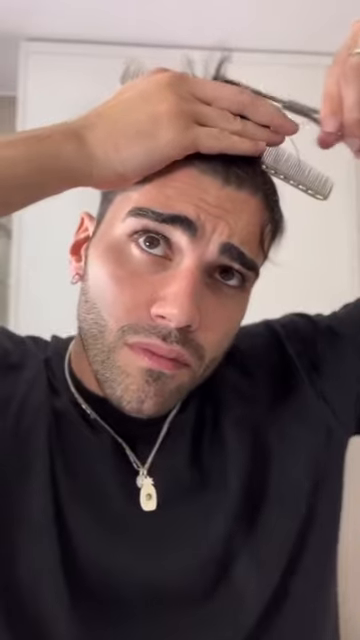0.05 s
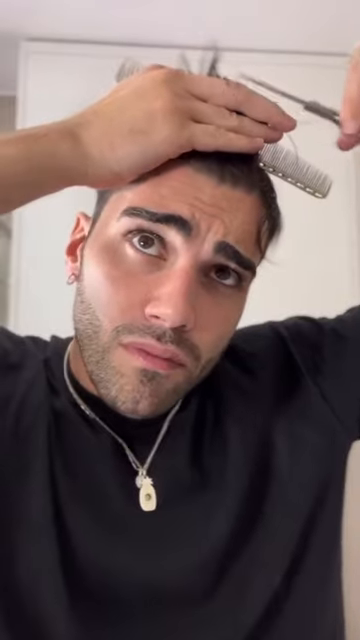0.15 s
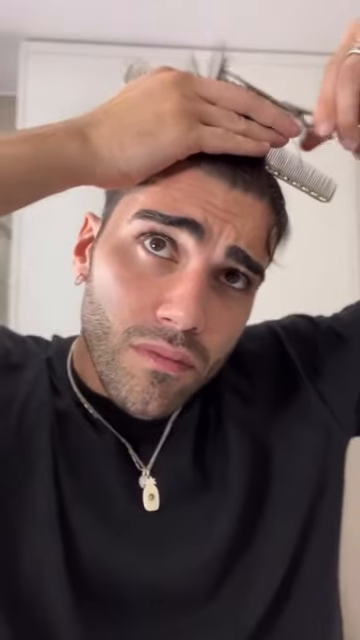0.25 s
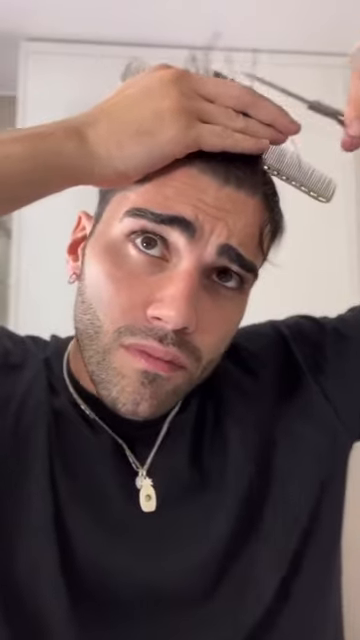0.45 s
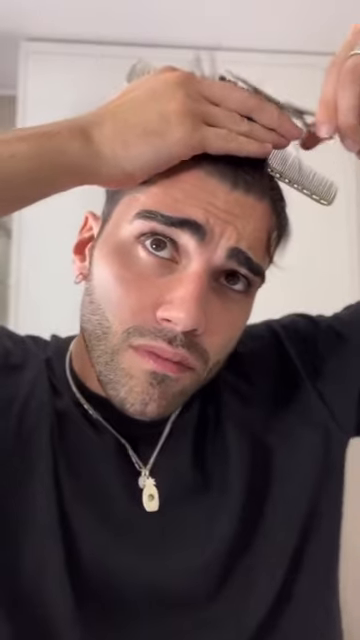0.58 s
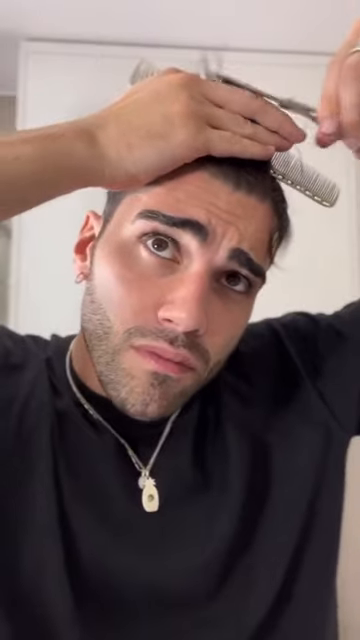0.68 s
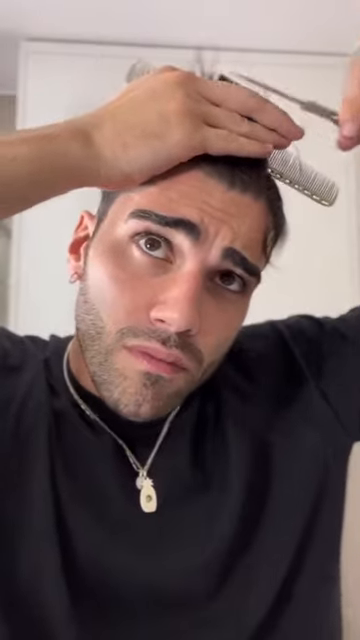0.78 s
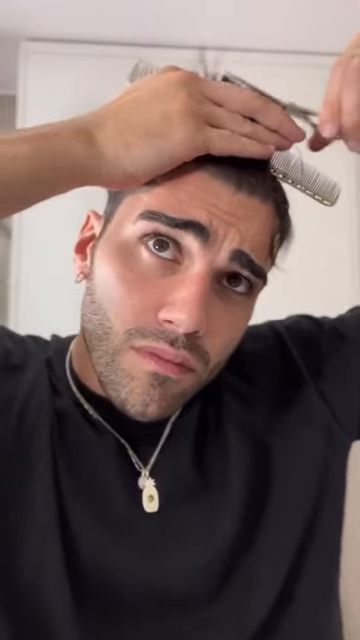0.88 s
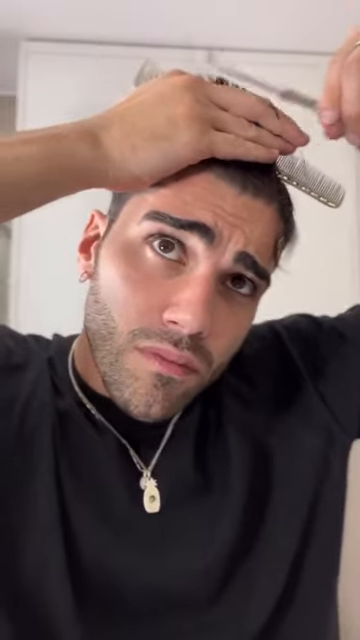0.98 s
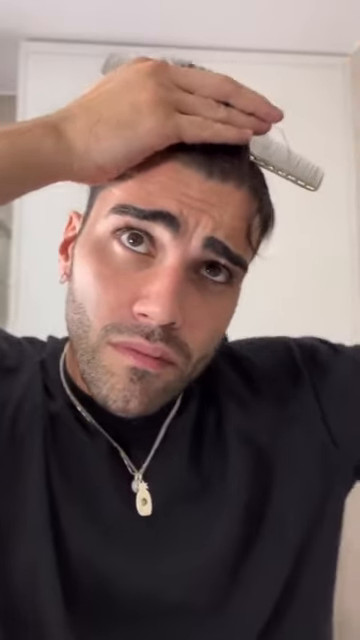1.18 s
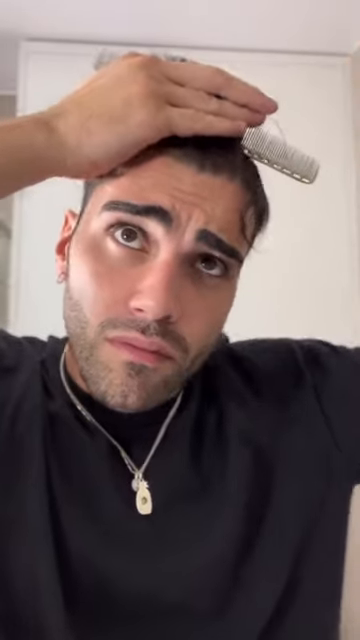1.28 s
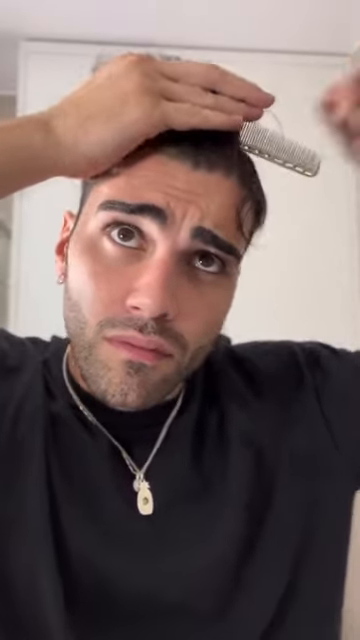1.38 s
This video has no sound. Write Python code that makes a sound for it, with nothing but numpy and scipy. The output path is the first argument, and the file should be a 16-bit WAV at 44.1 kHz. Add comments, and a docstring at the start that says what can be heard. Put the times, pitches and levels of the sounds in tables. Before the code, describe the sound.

Scissors snip through hair three times, close by in a small, bare room.

```python
"""Steel scissors cut hair close to a phone in a small, bare room.
First comes the fading echo of a cut made just before the start. Three cuts follow: each is a swelling
crunch of snapping hairs that ends in the clack of the handles, and then the blades rasp open.
Meanwhile a slow arm movement rustles a sleeve and stirs the room's low boom. Last, a light metal
clink leaves the blades ringing, and the boom sinks over a quiet background of air."""
import sys
import numpy as np
from scipy import signal
from scipy.fft import rfft, irfft
from scipy.io import wavfile

SR = 44100
rng = np.random.default_rng(int(sys.argv[2]) if len(sys.argv) > 2 else 0)


def inscribe(sig):
    """Save sig as 16-bit PCM at rate SR to the path in sys.argv[1].

    A 1-D sig is mono; a 2-D sig holds one channel per row.
    Samples are clipped to [-1, 1] before scaling.
    """
    pcm = np.round(np.clip(np.atleast_2d(sig).T, -1, 1) * 32767)
    wavfile.write(sys.argv[1], SR, pcm.astype(np.int16))


N = 63945
LEAD_S = .2  # the sound begins this long before time 0

# The tones (modes) at which the scissors ring. Each row: pitch in Hz, seconds to fade by 60 dB (t60),
# then relative level in dB when struck, when closing and when sliding open.
SCISSOR_MODES = [(610, 0.0066, -12, -9, -26), (935, 0.007, -7.5, -3, 6), (1158, 0.0092, -11.5, -7.5, -41),
                 (1764, 0.0097, -6.5, -11.5, -20), (2190, .012, -3, -9.5, -25), (2428, 0.011, -13, 3, 8),
                 (3264, 0.0092, -14, -11, -33), (3935, 0.008, -48, -1.5, -22.5),
                 (4230, 0.018, -14.5, -2, -28), (5206, 0.016, -19.5, -8.5, -9), (6110, 0.022, -29, -23, 1),
                 (8000, 0.063, -32, -19, 0.5)]


def cuts(t):
    """The edges slide, bite and crunch ever louder through the hair; the handles hit and bounce once."""
    # Each row: time the blades shut and crunch length in seconds, crunch level in dB, rasp pitch in Hz,
    # levels of hiss, clack and crack in dB, brightness of the clack in dB per octave.
    strokes = [(-.085, 0.023, -27.5, 2540, -33.5, -14.5, -22, -4),
               (0.2429, 0.035, -29.5, 2800, -39, -12, -27.5, -1.5),
               (.5722, 0.038, -32.5, 2460, -38.5, -14, -30.5, -1.5),
               (0.8264, 0.036, -31, 3850, -41.5, -10.5, -21, 1.5)]
    # The crack of steel on steel. Each row: frequency in Hz, relative level in dB.
    crack_colour = [(150, -14.5), (600, -1), (1500, -16.5), (3000, 5.5), (6000, -2.5), (9300, -10.5),
                    (11500, -2), (14500, -1.5), (16000, -11)]
    # The faint sizzle as the edges begin to slide. Each row: frequency in Hz, relative level in dB.
    sizzle_colour = [(3000, -17), (9500, -21), (11500, -8), (14000, -1), (16000, -1.5)]
    slide_db, slide_s, bite_db, bite_s = -51.5, 0.077, -16.5, 0.018
    rise_db, release_s = 29, 0.002
    bounce_db, bounce_s, crack_s = -13.5, 0.0042, 0.0039
    crack, sizzle, out = colour(noise(), crack_colour), colour(noise(), sizzle_colour), 0
    for at, length, crunch_db, rasp_hz, hiss_db, clack_db, crack_db, tilt_db in strokes:
        age = t - at  # negative until the blades shut
        ring, hiss = friction([db + favour(hz, rasp_hz) for hz, _, _, db, _ in SCISSOR_MODES])
        slide = undb(slide_db) * bump(age + slide_s, 2 * slide_s) ** 2 * (age < 0) * sizzle
        bite = undb(bite_db) * bump(age + length, bite_s)  # the edges first catch the hair
        grip = np.clip((age + length) / bite_s, 0, 1)
        release = np.exp(-np.maximum(age, 0) / release_s)
        swell = grip * undb(rise_db * np.minimum(age, 0) / length) * release
        crunch = (swell + bite) * undb(crunch_db) * ring + swell * undb(hiss_db) * hiss
        hit = undb(clack_db) * (clack(age, tilt_db) + undb(bounce_db) * clack(age - bounce_s, tilt_db))
        out = out + slide + crunch + hit + undb(crack_db) * fade(age, crack_s) * crack
    return out


def clack(age, tilt_db):
    """The handles meet and ring the hand-damped scissors; neighbouring tones swing opposite ways."""
    pivot_hz = 2150  # brightness tilts around this pitch
    return radiate(sum((-1) ** k * undb(db + tilt_db * np.log2(hz / pivot_hz)) * mode(age, hz, t60)
                       for k, (hz, t60, db, _, _) in enumerate(SCISSOR_MODES)))


def friction(levels_db):
    """Many tiny snaps along the edges: returns the ring they raise in the blades, and their own hiss."""
    # The hiss of the edges. Each row: frequency in Hz, relative level in dB.
    edge_colour = [(200, -34.5), (1200, -21), (3000, 7), (5500, 8), (7500, 14), (9300, -13), (11500, 8),
                   (14500, 3.5), (16000, 6.5)]
    snaps_per_s, spread_db = 4000, 3
    n = len(clock())
    snaps = (rng.random(n) < snaps_per_s / SR) * rng.choice([-1, 1], n)
    snaps = snaps * undb(spread_db * np.minimum(rng.exponential(size=n), 4))  # a few are much louder
    age = np.arange(SR // 20) / SR
    body = sum((-1) ** k * undb(db) * unit(mode(age, hz, t60))
               for k, ((hz, t60, *_), db) in enumerate(zip(SCISSOR_MODES, levels_db)))
    ring = unit(signal.fftconvolve(snaps, radiate(body))[:n])
    return ring, colour(unit(snaps) + noise() / 2, edge_colour)


def favour(hz, rasp_hz):
    """The point of contact drives tones near one pitch hardest: 7.5 dB less for each octave away."""
    return -7.5 * abs(np.log2(hz / rasp_hz))


def radiate(x):
    """So small a body gives off little bass."""
    return signal.sosfilt(signal.butter(2, 375, "high", fs=SR, output="sos"), x)


def openings(t):
    """The blades rasp softly over each other as they open."""
    # Each row: start and length in seconds, ring level in dB, rasp pitch in Hz, hiss level in dB.
    slides = [(0.356, 0.049, -61, 3000, -55.5), (0.687, 0.0075, -37, 3300, -40.5),
              (0.694, 0.039, -53, 6000, -49.5), (1.063, 0.032, -55, 4300, -59.5)]
    out = 0
    for at, length, ring_db, rasp_hz, hiss_db in slides:
        ring, hiss = friction([db + favour(hz, rasp_hz) for hz, *_, db in SCISSOR_MODES])
        out = out + bump(t - at, length) * (undb(ring_db) * ring + undb(hiss_db) * hiss)
    return out


def clink(t):
    """Two quick, bright touches of metal leave the blades ringing thinly."""
    # The touches. Each row: start in seconds, level in dB.
    touches = [(1.098, -32), (1.1015, -28.5)]
    # Their bright noise. Each row: frequency in Hz, relative level in dB.
    touch_colour = [(300, -11), (700, -22), (1100, -27), (2100, 6.5), (2900, -2), (3550, 5), (4300, -2.5),
                    (5100, 5), (5800, -1), (6500, -9), (7800, -2), (9500, -7.5), (13000, -3.5),
                    (16000, -6.5)]
    # The tones of the free blades. Each row: pitch in Hz, t60 in seconds, relative level in dB.
    blade_tones = [(7811, .22, -8), (8441, .28, -6), (10508, .3, 0), (11200, .35, -14)]
    ring_db, last_touch_s = -47, touches[-1][0]
    bursts = sum(undb(db) * fade(t - at, decay_s=0.0029) for at, db in touches)
    ring = sum(undb(ring_db + db) * mode(t - last_touch_s, hz, t60) for hz, t60, db in blade_tones)
    return colour(noise(), touch_colour) * bursts + ring


def room(x):
    """The bare walls return a smooth echo in which the treble dies first."""
    # Each row: centre of a band in Hz, t60 in seconds, echo level in dB.
    bands = [(150, 0.56, 8), (470, 0.46, -7), (1140, 0.58, -2.5), (1520, 0.54, -1), (2140, 0.45, -4),
             (4100, 0.41, -3), (7170, 0.43, 0.5), (9260, 0.12, -13), (12960, 0.32, -3.5)]
    build_s = 0.003
    age = np.arange(SR) / SR
    white, f = rfft(rng.standard_normal(SR)), np.maximum(np.fft.rfftfreq(SR, 1 / SR), 1)
    centres, tail = np.log([row[0] for row in bands]), 0
    for share, (_, t60, db) in zip(np.eye(len(bands)), bands):
        band = irfft(white * np.interp(np.log(f), centres, share), SR)
        rate = np.log(1000) / t60
        tail = tail + undb(db) * np.sqrt(2 * rate / SR) * band * np.exp(-rate * age)
    return signal.fftconvolve(x, tail * (1 - np.exp(-age / build_s)))[:len(x)]


def background(t):
    """Room air and low boom; one slow arm movement rustles the sleeve and stirs the boom."""
    # The room's low tones. Each row: pitch in Hz, t60 in seconds, steady and stirred levels in dB.
    low_tones = [(58.1, 1, -58.5, -95), (94.04, 0.35, -65, -52.5), (132.24, 0.39, -59.5, -59),
                 (202.4, 0.48, -77, -53), (286.4, 0.5, -76.5, -55.5)]
    # The rustle of the sleeve. Each row: frequency in Hz, relative level in dB.
    sleeve_colour = [(60, -14), (200, 11), (400, -2.5), (1000, -4.5), (2200, -4), (5000, -11), (9000, -29),
                     (16000, -65)]
    # The steady hush of the air. Each row: frequency in Hz, relative level in dB.
    air_colour = [(30, -22.5), (60, -2.5), (140, -3), (300, -15.5), (600, -16.5), (950, -7.5), (1500, -6),
                  (2200, -5.5), (3200, -15), (7000, -22.5), (10000, -37.5), (16000, -36)]
    peak_s, rise_s, fall_s = .6, .17, 0.18
    rest_at_s, rest_fade_s, rest_db = 1.137, 0.079, -7  # the boom sinks when the arms come to rest
    sleeve_db, air_db = -46.5, -60
    move = np.exp(-((t - peak_s) / np.where(t < peak_s, rise_s, fall_s)) ** 2 / 2)
    boom = sum(resonate(noise(), hz, t60) * (undb(steady_db) + undb(stirred_db) * move)
               for hz, t60, steady_db, stirred_db in low_tones)
    rest = undb(rest_db * np.clip((t - rest_at_s) / rest_fade_s, 0, 1))
    sleeve = undb(sleeve_db) * move * colour(noise(), sleeve_colour)
    return rest * boom + sleeve + undb(air_db) * colour(noise(), air_colour)


def undb(db):
    """Turn decibels into a gain."""
    return 10 ** (np.asarray(db) / 20)


def clock():
    """The time of every sample in seconds, with the lead-in."""
    return np.arange(-int(LEAD_S * SR), N) / SR


def unit(x):
    """Scale to an average (rms) level of 1."""
    return x / np.sqrt(np.mean(x ** 2))


def noise():
    """White noise over the whole scene."""
    return rng.standard_normal(len(clock()))


def colour(x, points):
    """Shape a steady sound's bass and treble along (Hz, dB) points, at level 1."""
    hz, db = np.array(points).T
    f = np.maximum(np.fft.rfftfreq(len(x), 1 / SR), 1)
    gain = undb(np.interp(np.log(f), np.log(hz), db))
    return unit(irfft(rfft(x) * gain, len(x)))


def mode(age, hz, t60):
    """A pure tone that starts at age 0 and fades by 60 dB in t60 seconds."""
    age = np.maximum(age, 0)
    return np.sin(2 * np.pi * hz * age) * np.exp(-np.log(1000) * age / t60)


def resonate(x, hz, t60):
    """Keep one tone ringing with a steady sound, at level 1."""
    return unit(signal.fftconvolve(x, mode(np.arange(SR // 2) / SR, hz, t60))[:len(x)])


def fade(age, decay_s):
    """A sudden start at age 0 that dies away."""
    return (age >= 0) * np.exp(-np.abs(age) / decay_s)


def bump(age, length):
    """A smooth rise and fall that starts at age 0."""
    return np.sin(np.pi * np.clip(age / length, 0, 1))


def scene():
    """The scissors in the room, in mono."""
    clink_echo_db = 2  # the clink points away from the phone, so more of it comes by way of the room
    t = clock()
    snips, metal = cuts(t) + openings(t), clink(t)
    echo = room(snips + undb(clink_echo_db) * metal)
    return (snips + metal + echo + background(t))[None, -N:]


def record(dry):
    """The phone cuts off the highest treble."""
    top_hz = 15900
    return signal.sosfilt(signal.ellip(10, .2, 80, top_hz, fs=SR, output="sos"), dry)


dry = scene()
out = record(dry)
inscribe(out)
```